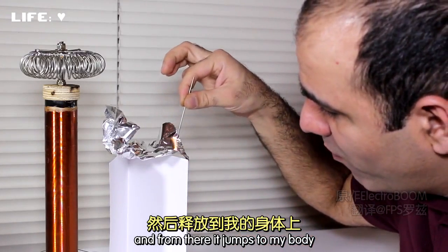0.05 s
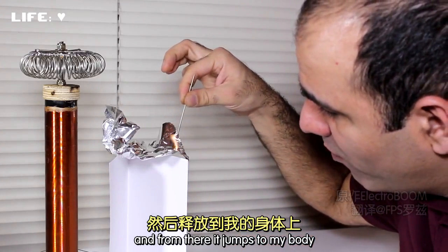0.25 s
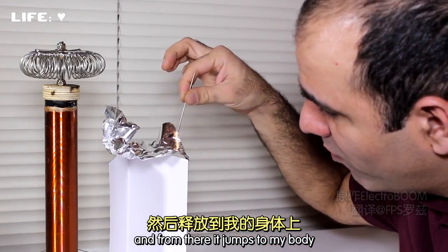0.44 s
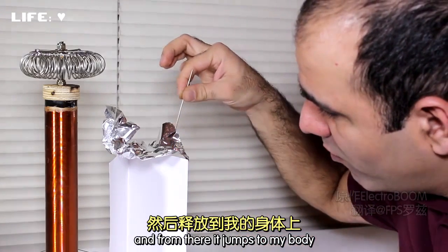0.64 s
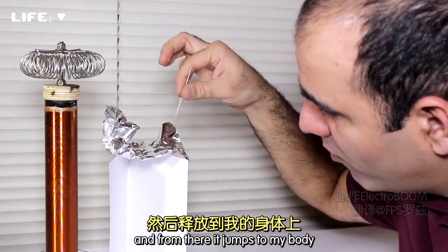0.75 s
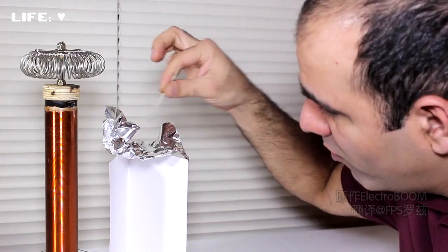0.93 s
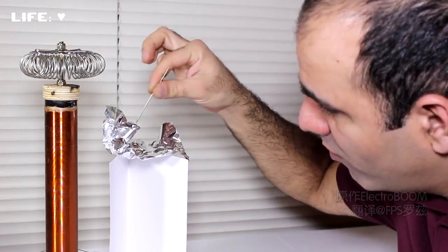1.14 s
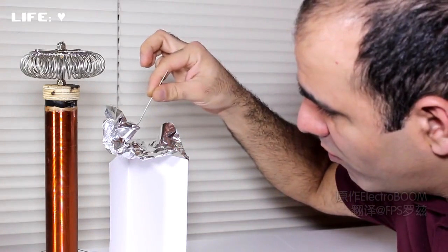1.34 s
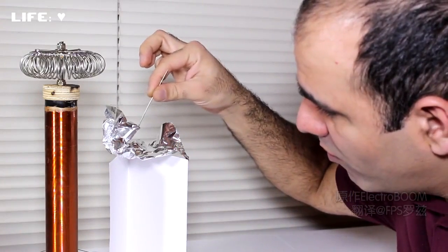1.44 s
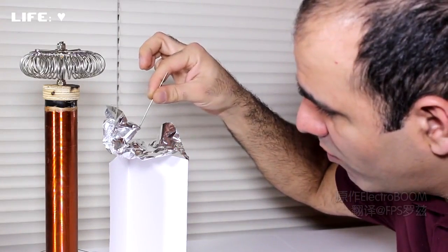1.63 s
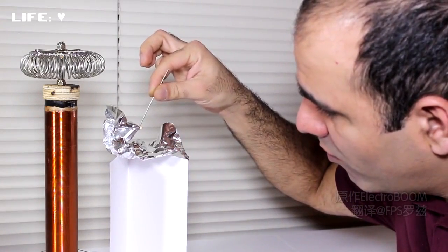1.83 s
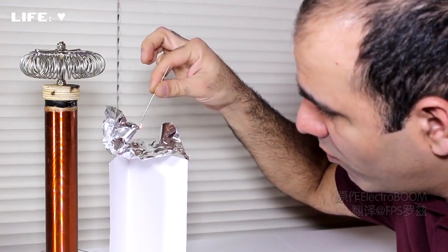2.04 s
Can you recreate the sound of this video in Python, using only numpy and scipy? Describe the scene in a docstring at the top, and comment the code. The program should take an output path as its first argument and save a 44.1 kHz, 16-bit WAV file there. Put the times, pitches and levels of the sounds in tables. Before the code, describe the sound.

A raspy electric arc sizzles close by, stops abruptly, then foil rustles and weaker sizzling grows

```python
"""Tiny sparks hiss between a foil cup and a hand-held needle, close to a stereo microphone in a small room.
Thousands of random snaps a second gather into a strong and a weaker bunch in every mains cycle.
The arc breaks and the room rings out over household hum, which is steady shaped noise.
The needle brushes the foil in swells of dull crinkles, then a fainter arc of the same snaps grows."""
import sys
import numpy as np
from scipy import signal
from scipy.fft import rfft, irfft
from scipy.io import wavfile

SR = 44100
rng = np.random.default_rng(int(sys.argv[2]) if len(sys.argv) > 2 else 0)


def rack_gain(trim_db):
    """Turn a fader trim in dB into the linear factor to multiply a signal by."""
    fader = np.asarray(trim_db, float)
    return 10 ** (fader / 20)


def dump(signal):
    """Clip the signal to [-1, 1] and save it as 16-bit WAV at the path in sys.argv[1]."""
    limited = np.clip(np.atleast_2d(signal).T, -1, 1)
    pcm = np.round(limited * 32767).astype(np.int16)
    wavfile.write(sys.argv[1], SR, pcm)


N = 91772
TIME_S = np.arange(N) / SR


def curve(table, hz):
    """Read a table at hz, in straight lines over log frequency."""
    table = np.array(table, float)
    return np.interp(np.log(np.maximum(hz, 1)), np.log(table[:, 0]), table[:, 1])


def colour(x, table):
    """Shape the spectrum with a minimum-phase filter, so nothing sounds ahead of a snap; rms 1 out."""
    gain_db = curve(table, np.fft.rfftfreq(2048, 1 / SR))
    cepstrum = irfft(np.log(rack_gain(gain_db)))
    # folding the cepstrum onto positive time makes the filter causal
    cepstrum[1:1024] *= 2
    cepstrum[1025:] = 0
    impulse = irfft(np.exp(rfft(cepstrum)))
    y = signal.fftconvolve(x, impulse)[:len(x)]
    return y / y.std()


def clicks(rate, scatter_db):
    """Random one-sample snaps of either sign, sizes spread evenly in dB over scatter_db."""
    chance = rng.random((3, N))
    happens = chance[0] < rate / SR
    sign = np.sign(chance[1] - .5)
    return happens * sign * rack_gain(-scatter_db * chance[2])


def half_octave(hz, centre):
    """Triangular band weight; neighbours half an octave apart sum to one."""
    return np.clip(1 - 2 * abs(np.log2(np.maximum(hz, 1) / centre)), 0, 1)


def through(x, response):
    """Convolve with each response; a mirrored lead-in makes the tails start full, as of a sound under way."""
    size = response.shape[1]
    led_in = np.r_[x[size:0:-1], x]
    return signal.fftconvolve(led_in[None], response, axes=1)[:, size:size + N]


# Tone of the background. Each row: frequency in Hz, relative noise density in dB.
HUM_TONE = [(21, -52), (36, -1), (65, -16), (85, -2.5), (122, -8), (174, 0), (230, -7.5), (289, -6.5),
            (312, -13.5), (345, -3.5), (382, -14), (480, -13), (560, -18.5), (619, -14.5), (686, -17),
            (840, -18.5), (978, -20), (1710, -23), (2700, -24), (4160, -24), (15600, -35.5)]
# Width of the background. Each row: frequency in Hz, side minus mid in dB.
HUM_WIDTH = [(60, -7), (110, -7), (200, -6), (380, -1), (700, 5), (1290, 5), (2380, 5), (4400, 1.5),
             (8120, 1), (15000, 0)]


def hum():
    """Steady household rumble in the room's low resonances, over wide microphone hiss: shaped noise."""
    mid_rms_db, left_db = -55, -0.2  # the right side gets the opposite of left_db
    hz = np.fft.rfftfreq(N, 1 / SR)
    mid_gain = rack_gain(curve(HUM_TONE, hz))
    gains = np.array([mid_gain, mid_gain * rack_gain(curve(HUM_WIDTH, hz))])
    mid, side = irfft(rfft(rng.standard_normal((2, N))) * gains, N)
    stereo = np.array([(mid + side) * rack_gain(left_db), (mid - side) * rack_gain(-left_db)])
    return rack_gain(mid_rms_db) / mid.std() * stereo


# Decay of the room. Each row: frequency in Hz, time to fall 60 dB in seconds.
ROOM_DECAY = [(500, .45), (1500, 0.49), (3000, 0.46), (6000, 0.51), (9000, 0.28), (12000, .3),
              (15000, 0.32)]
# Width of the room. Each row: frequency in Hz, side minus mid in dB.
ROOM_WIDTH = [(400, -10.5), (1000, -6), (1600, -16), (2300, -2), (4000, -3), (7000, 2), (10000, -6.5),
              (15000, 1)]


def room(x):
    """Reverb as mid and side noise tails, each half-octave dying at its own rate."""
    level_db, gap_s = -4, 0.0022  # gap: silence ahead of the tail
    early_db, early_t60_s = 7.5, .1  # nearby walls add a strong, short start to the tail
    size = SR // 2
    t, hz = np.arange(size) / SR, np.fft.rfftfreq(size, 1 / SR)
    noise = rfft(rng.standard_normal((2, size)))
    tails = 0
    for centre in 250 * 2 ** np.arange(0, 6.1, .5):
        t60 = curve(ROOM_DECAY, centre)
        band = irfft(noise * half_octave(hz, centre), size)
        band[1] *= rack_gain(curve(ROOM_WIDTH, centre))
        # the root evens out the energy of long and short decays
        tails = tails + band * 1000. ** (-t / t60) * np.sqrt(2 * np.log(1000) / t60 / SR)
    early = 1 + rack_gain(early_db) * 1000. ** (-t / early_t60_s)
    mid, side = through(x, tails * (t > gap_s) * early)
    return rack_gain(level_db) * np.array([mid + side, mid - side])


# Narrow resonances within the hiss. Each row: frequency in Hz, relative level in dB.
RESONANCES = [(1680, -47), (2089, -48), (2369, -50), (3295, -49), (3408, -49), (3542, -46), (4156, -49),
              (4613, -45), (4673, -48), (5136, -48), (5378, -49), (5491, -46), (5701, -51), (6412, -52)]


def rings(snaps):
    """Narrow resonances rung by the bare snaps: decaying sines, equal on both sides."""
    t60_s, level_db = 0.09, 30.5
    t = np.arange(int(SR * .3)) / SR
    tones = sum(rack_gain(db) * np.sin(2 * np.pi * hz * t + 2 * np.pi * rng.random()) for hz, db in RESONANCES)
    ring = tones * 1000. ** (-t / t60_s)
    ring *= np.sqrt(4 * np.log(1000) / t60_s / SR)  # unit energy for a tone of amplitude 1
    return rack_gain(level_db) * through(snaps, ring[None])[0]


# Needle strokes on the foil. Each row: crest in seconds, relative level in dB,
# rise and fall time constants in seconds.
BRUSH_STROKES = [(1.639, -51.5, .015, 0.018), (1.67, -42, 0.007, 0.0089), (1.69, -38.5, 0.0091, .015),
                 (1.753, -37, 0.0072, 0.0046), (1.775, -48, 0.0092, 0.012)]
# Tone of crinkling foil. Each row: frequency in Hz, relative density in dB.
FOIL_TONE = [(240, -41), (400, -17), (466, -25), (511, -12), (596, -17.5), (738, -9.5), (958, -15.5),
             (1000, 4), (1080, -24), (1190, -8), (1690, -5), (1820, -3), (2300, -14), (3220, -11.5),
             (6030, -12.5), (7030, -23.5), (9700, -23), (13600, -30), (15600, -59)]


def foil():
    """The needle brushes the foil: each stroke is an exponential swell of dull crinkles."""
    crinkles_per_s, scatter_db = 3300, 21
    swell = 0
    for crest, db, rise, fall in BRUSH_STROKES:
        swell = swell + rack_gain(db) * np.exp(np.minimum((TIME_S - crest) / rise, (crest - TIME_S) / fall))
    return swell * colour(clicks(crinkles_per_s, scatter_db), FOIL_TONE)


def drifting(x):
    """The colour shifts as the arc wanders: each half-octave wavers on its own."""
    drift_db, drift_per_s = 0.5, 13.85  # spread of the random levels, new levels per second
    hz, spectrum = np.fft.rfftfreq(N, 1 / SR), rfft(x)
    hold = int(SR / drift_per_s)
    out = 0
    for centre in 125 * 2 ** np.arange(0, 7.6, .5):
        band = irfft(spectrum * half_octave(hz, centre), N)
        waver = np.interp(np.arange(N) / hold, np.arange(128), rng.standard_normal(128))
        out = out + band * rack_gain(drift_db * waver)
    return out


# Bunching of the snaps. Each row: place in the mains cycle from 0 to 1,
# half-width in cycles where the lift has fallen to 1/e, lift in dB.
MAINS_BUNCHES = [(0.0, .11, 8), (.4, .06, 3)]


def arc(rows, crest_s, on, tone):
    """Snaps swell with the mains and turn brighter or duller as the gap changes; gives hiss and bare snaps."""
    snaps_per_s, scatter_db, mains_hz, treble_hz = 4000, 15.5, 60, 7000
    start_s, level_db, treble_db = np.array(rows, float).T
    cycle = (TIME_S - crest_s) * mains_hz
    bunch_db = 0
    for place, width, db in MAINS_BUNCHES:
        distance = (cycle - place + .5) % 1 - .5
        bunch_db = bunch_db + db * np.exp(-(distance / width) ** 2)
    snaps = clicks(snaps_per_s, scatter_db) * rack_gain(bunch_db)
    hiss = drifting(colour(snaps, tone))
    gain = rack_gain(np.interp(TIME_S, start_s, level_db)) * np.clip(on, 0, 1)
    low = signal.sosfiltfilt(signal.butter(2, treble_hz, fs=SR, output="sos"), hiss)
    treble = (hiss - low) * rack_gain(np.interp(TIME_S, start_s, treble_db))
    return (low + treble) * gain, snaps / snaps.std() * gain


# The fainter arc growing. Each row: time in seconds, relative level in dB, extra treble level in dB.
FAINT_ARC = [(1.8, -54, 0), (1.84, -48, 0), (1.91, -49, 0), (1.94, -46, 0), (2.005, -44.5, 0.0045),
             (2.028, -35.5, 0), (2.08, -38.5, 0)]
# Tone of the fainter arc. Each row: frequency in Hz, relative density in dB.
FAINT_TONE = [(240, -34), (400, -8), (643, -7), (727, -6.5), (1380, -4), (1690, -1.5), (2890, -7),
              (3930, -4), (4510, -10), (5940, -3.5), (7250, -13.5), (10000, -8.5), (15600, -20.5)]


def faint_arc():
    """A weaker arc that fades in linearly ahead of its first row."""
    fade_in_s = 0.036
    on = (TIME_S - FAINT_ARC[0][0]) / fade_in_s + 1
    return arc(FAINT_ARC, 1.8893, on, FAINT_TONE)[0]


# The main arc burning. Each row: time in seconds, relative level in dB, extra treble level in dB.
MAIN_ARC = [(0, -24, 4), (.05, -29, -1), (.09, -25.5, -1.5), (.125, -30, 0), (.16, -27.5, 2),
            (.23, -26.5, 3.5), (.29, -26.5, -2), (.35, -28, -1.5), (.4, -26.5, 0), (.48, -27, -1.5),
            (.55, -26.5, 0), (.62, -27.5, 0), (.66, -29.5, -6), (.68, -32.5, -8), (.695, -35.5, -8)]
# Tone of the main arc. Each row: frequency in Hz, relative density in dB.
MAIN_TONE = [(220, -62.5), (380, -37), (424, -19.5), (560, -28), (596, -13), (645, -28), (753, -8.5),
             (853, -23.5), (922, -11), (1080, -14), (1240, -5.5), (1400, -12), (1660, -1.5), (1940, -7),
             (2070, -3.5), (2490, -4.5), (3050, -2), (3300, -1), (4360, -5), (4570, -2), (5340, -3),
             (7280, -8.5), (9490, -4.5), (11600, -9), (15600, -20.5)]


def main_arc():
    """The bright arc, burning from the start and breaking off just after its last row."""
    break_s = 0.0033
    on = (MAIN_ARC[-1][0] - TIME_S) / break_s + 1
    return arc(MAIN_ARC, .9995, on, MAIN_TONE)


def scene():
    """Direct sound reaches the left side a touch late; room, rings and hum surround it."""
    left_late_s = .00002
    hiss, snaps = main_arc()
    source = (hiss + faint_arc() + foil()) * rack_gain(-3.0)
    lag = np.exp(-2j * np.pi * np.fft.rfftfreq(N, 1 / SR) * left_late_s)
    direct = np.array([irfft(rfft(source) * lag, N), source])
    return direct + room(source) + rings(snaps) + hum()


def roll_off(x):
    """The treble ends steeply here."""
    return signal.sosfilt(signal.butter(12, 15780, fs=SR, output="sos"), x)


def record(dry):
    """A steep elliptic low-pass cuts the top above 15420 Hz."""
    top_cut = signal.ellip(10, .2, 70, 15420, fs=SR, output="sos")
    mix = signal.sosfilt(top_cut, dry)
    return roll_off(mix)


dry = scene()
out = record(dry)
dump(out)
```